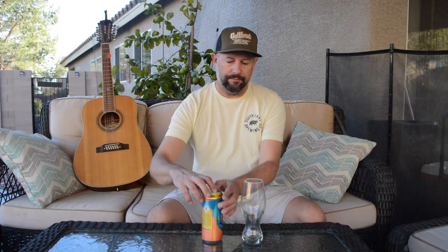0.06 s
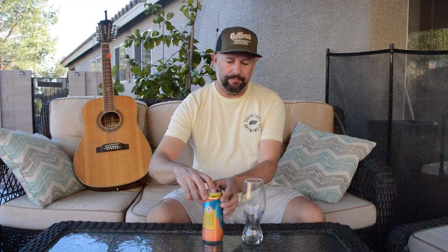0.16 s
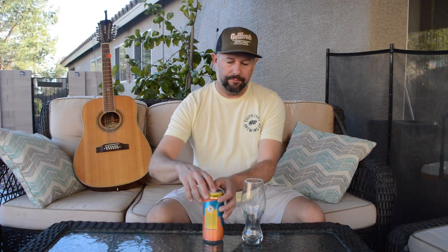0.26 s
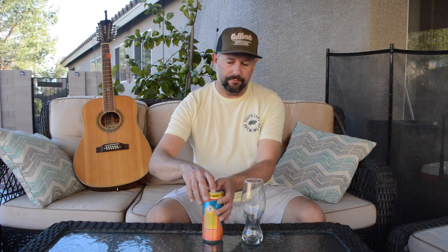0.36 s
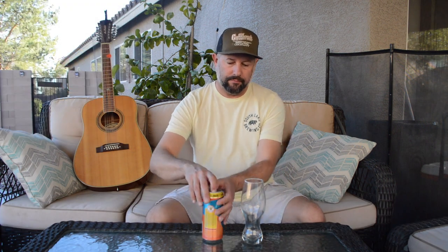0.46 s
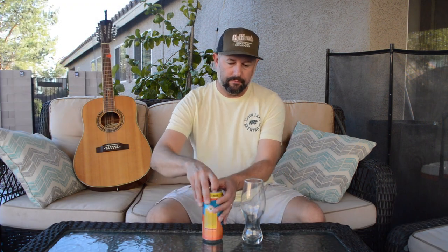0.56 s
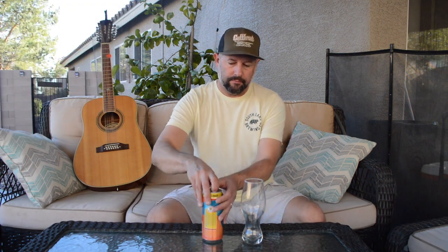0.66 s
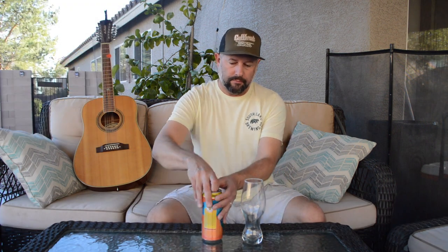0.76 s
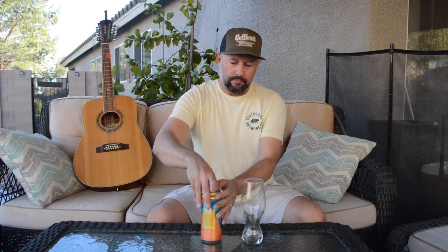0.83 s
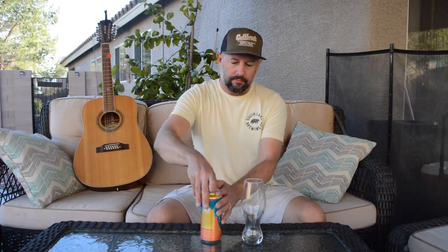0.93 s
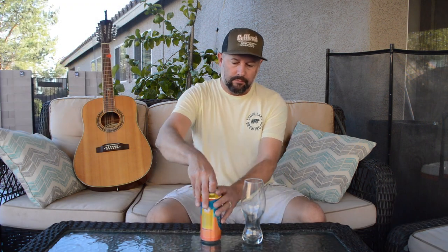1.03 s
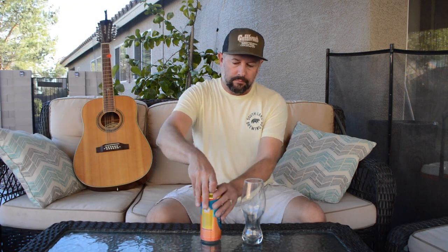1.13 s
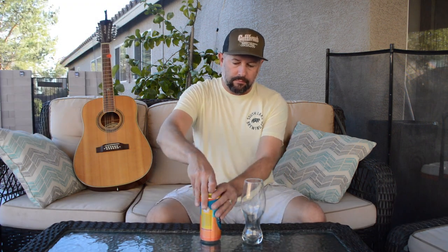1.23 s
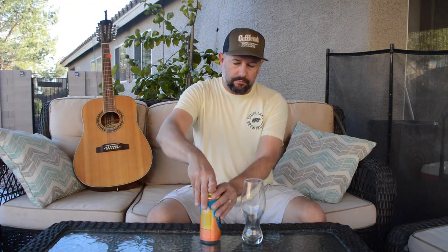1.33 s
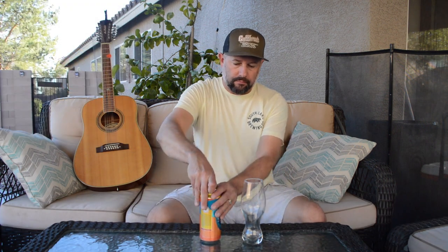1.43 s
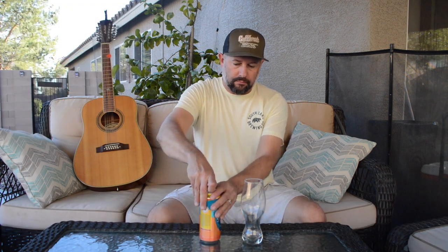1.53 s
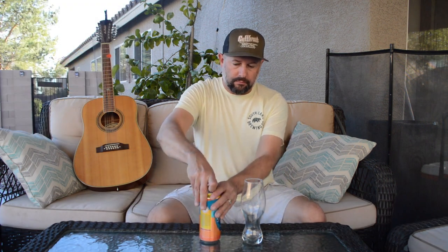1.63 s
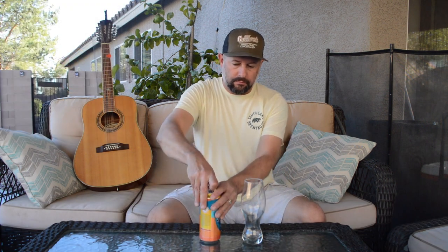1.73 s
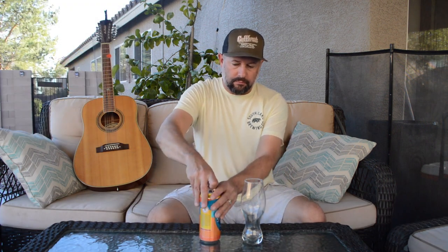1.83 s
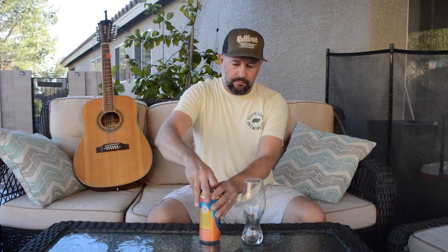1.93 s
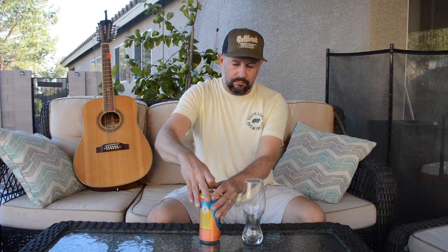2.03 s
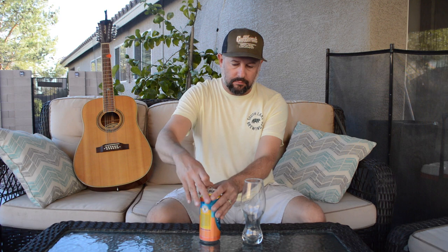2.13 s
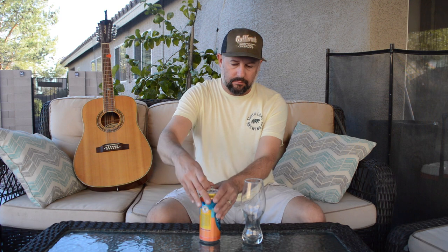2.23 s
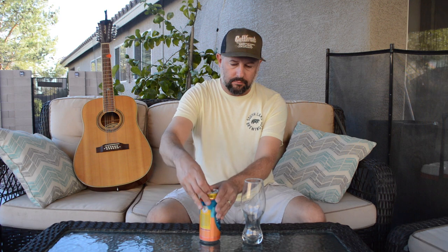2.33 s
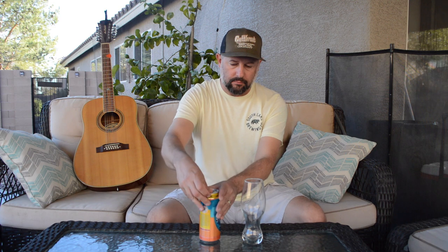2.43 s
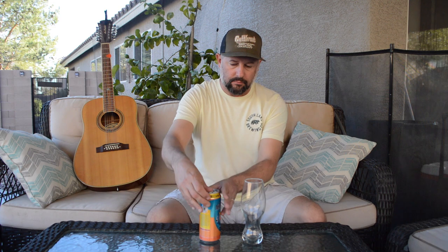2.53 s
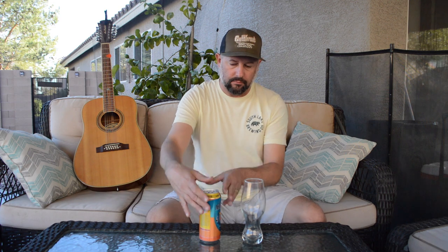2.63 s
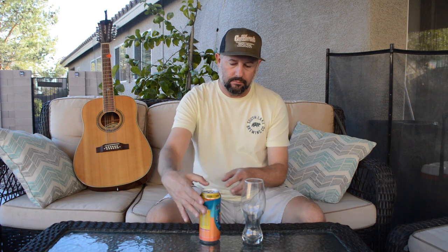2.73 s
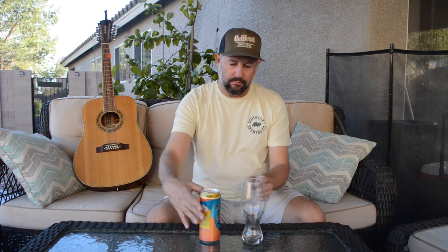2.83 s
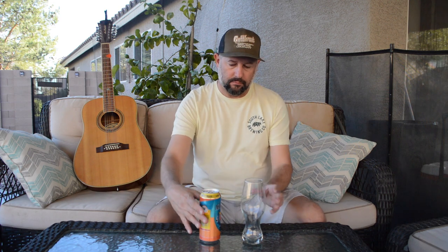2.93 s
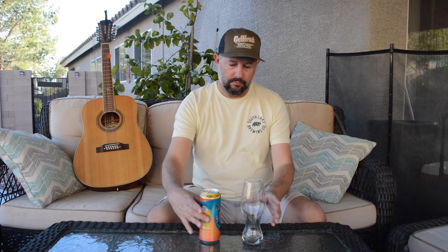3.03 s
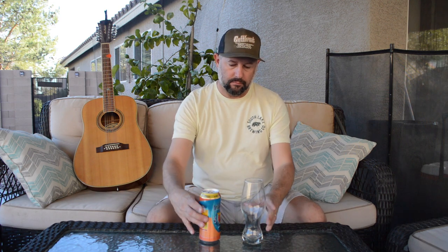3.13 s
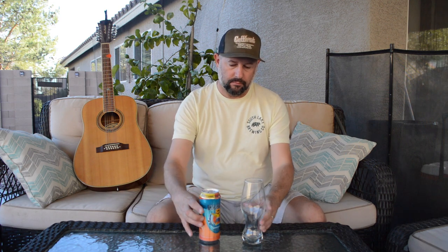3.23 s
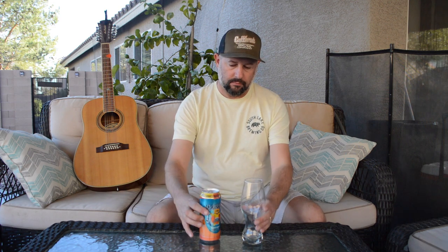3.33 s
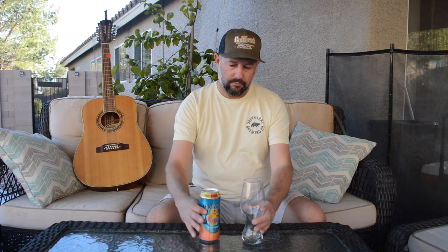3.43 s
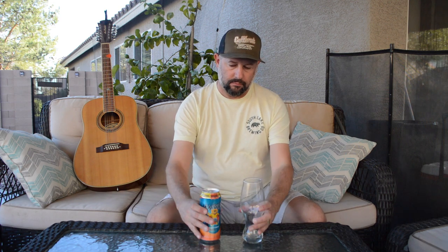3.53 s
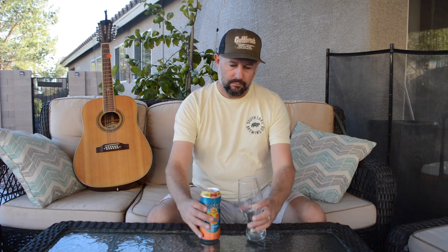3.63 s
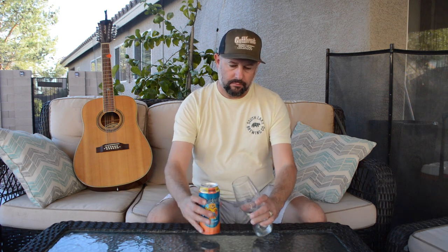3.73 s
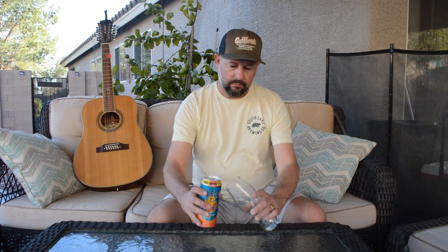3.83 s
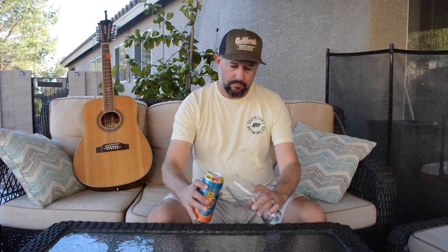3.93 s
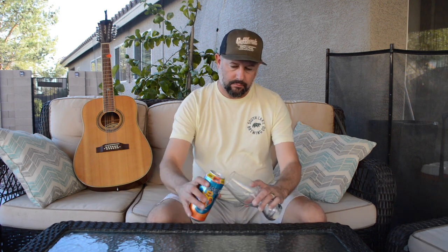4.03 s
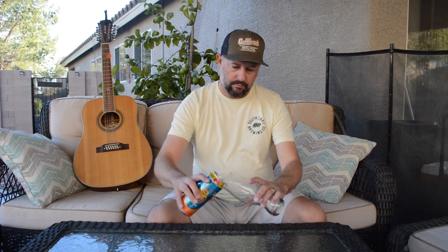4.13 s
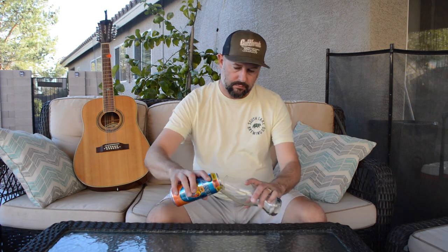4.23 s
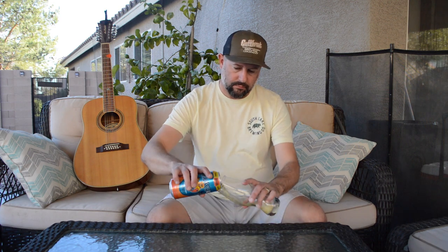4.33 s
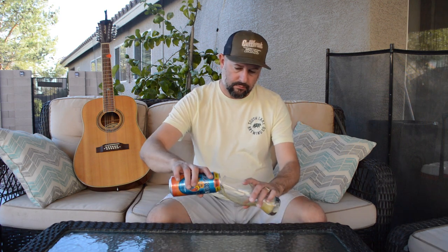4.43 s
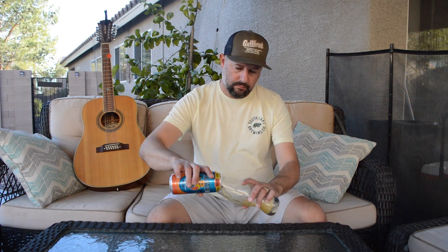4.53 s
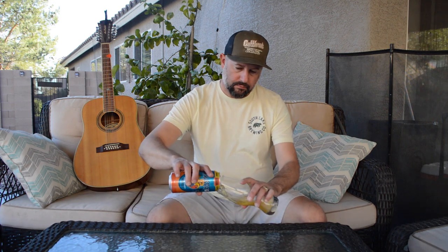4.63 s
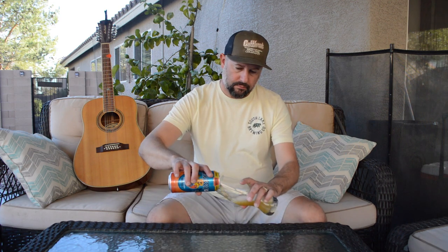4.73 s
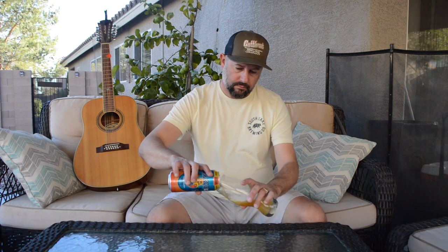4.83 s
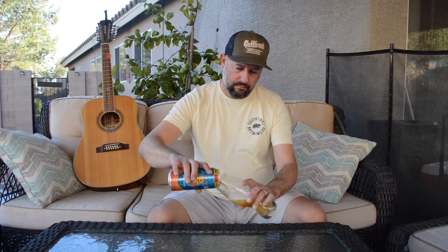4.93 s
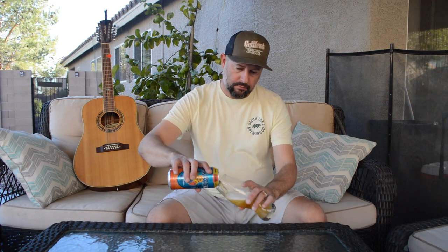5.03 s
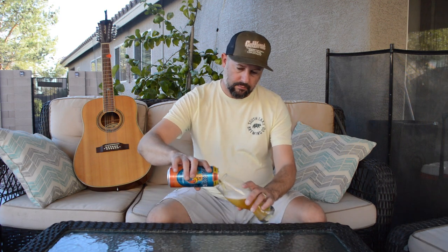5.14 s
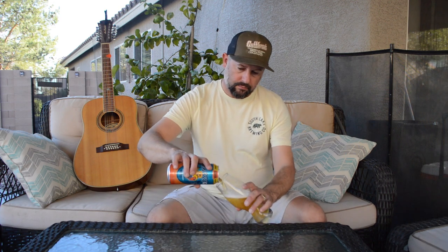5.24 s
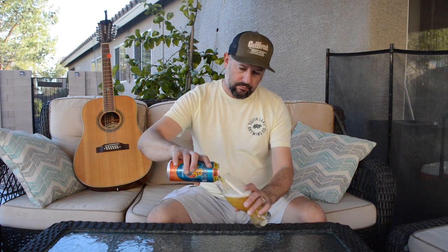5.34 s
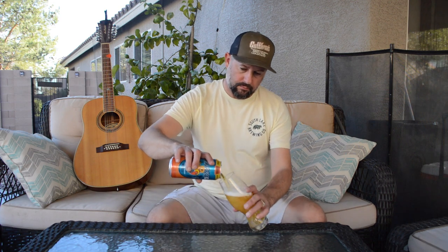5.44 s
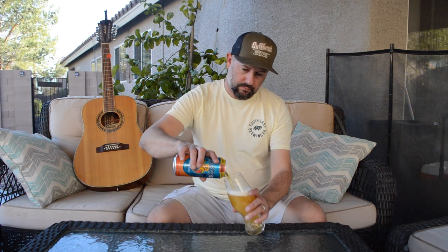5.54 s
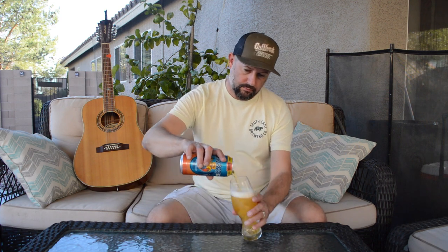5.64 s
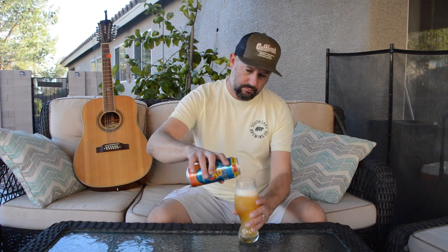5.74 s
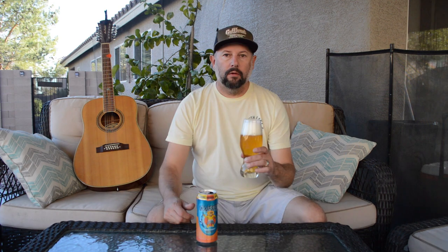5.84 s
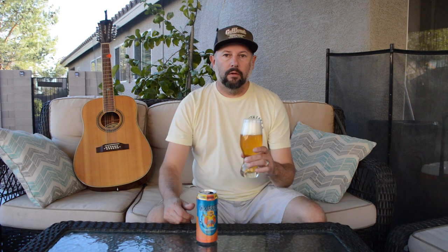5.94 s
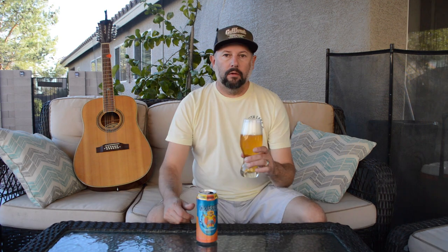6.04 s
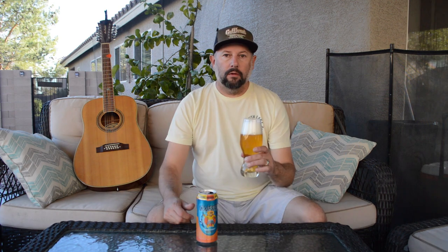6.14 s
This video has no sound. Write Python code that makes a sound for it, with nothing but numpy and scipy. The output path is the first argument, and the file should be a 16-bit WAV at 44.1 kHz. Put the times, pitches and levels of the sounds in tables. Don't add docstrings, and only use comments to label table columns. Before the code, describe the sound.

On a quiet patio, a can cracks open violently with a tiny spit of gas, followed by faint handling, glass scraping, and one sharp glass clack.

```python
import sys
import numpy as np
from scipy import signal
from scipy.fft import rfft, irfft
from scipy.io import wavfile
from scipy.ndimage import uniform_filter1d

SR = 44100
rng = np.random.default_rng(int(sys.argv[2]) if len(sys.argv) > 2 else 0)


def int16_out(signal):
    q = np.round(np.clip(np.atleast_2d(signal).T, -1, 1) * 32767)
    wavfile.write(sys.argv[1], SR, q.astype(np.int16))


def decibels_to_gain(level_db):
    exponent = np.asarray(level_db, float) / 20
    return 10 ** exponent


N = 272538
SPEED = 4


def gain_at(tone, size):
    hz, db = np.transpose(tone)
    bins = np.fft.rfftfreq(size, 1 / SR)
    return decibels_to_gain(np.interp(np.log(bins + 1), np.log(hz), db))


def noise(*tones):
    first = gain_at(tones[0], N)
    gain = np.prod([gain_at(tone, N) for tone in tones], axis=0)
    x = irfft(rfft(rng.standard_normal(N)) * gain, N)
    return x / np.sqrt(np.mean(first ** 2))


def causal(tone, size=1024):
    cepstrum = irfft(np.log(gain_at(tone, size)), size)
    cepstrum[1:size // 2] *= 2
    cepstrum[size // 2 + 1:] = 0
    return irfft(np.exp(rfft(cepstrum)), size)[:size // 2]


def ring(modes, seconds):
    t = np.arange(int(seconds * SR)) / SR
    out = 0
    for k, (hz, db, t60) in enumerate(modes):
        out = out + (-1) ** k * decibels_to_gain(db - 60 * t / t60) * np.sin(2 * np.pi * hz * t)
    return out


def walk(rate):
    k = int(SR / rate)
    held = np.repeat(rng.standard_normal(N // k + 1), k)
    return uniform_filter1d(held, k)[:N]


def swell(start_s, db, rise_s, fall_db_s, hold_s=0, sag_db=0):
    t = np.arange(N) / SR - start_s
    sag = sag_db * np.clip((t - rise_s) / (hold_s + 1e-4), 0, 1)
    fall = fall_db_s * np.clip(t - rise_s - hold_s, 0, 1)
    return np.clip(t / rise_s, 0, 1) * decibels_to_gain(db + sag - fall)


def add(out, s, db, x):
    i = int(s * SR)
    out[i:i + len(x)] += (decibels_to_gain(db) * x / np.abs(x).max())[:N - i]


def cracks(events, tone):
    out = np.zeros(N)
    body = np.pad(causal(tone), (0, 1536))
    for (s, db, ms), chance in zip(events, rng.random((len(events), 5))):
        run = body
        lags = 1 + (ms * SR / 1000 * (.05 + .5 * chance ** 2)).astype(int)
        for lag in lags:
            loop = np.r_[1, np.zeros(lag - 1), -.62]
            run = signal.lfilter(loop[::-1], loop, run)
        first_snap = .35 * body
        add(out, s, db, run + first_snap)
    return out


# t/s, peak level/dB, length/ms
SEAL = [
    (1.5662, -11, 0.96),
]
BUCKLE = [
    (1.6200, -4, .9),
    (1.695, -37.5, .6),
    (1.737, -38, .6),
]
TEAR = [
    (1.7546, -18, 2.5),
    (1.7588, 9.5, 1.2),
]
# f/Hz, level/dB
SEAL_TONE = [(88, -50.5), (150, -30.5), (1480, -21.5), (2550, -9.5), (3620, 4.5), (6910, -0.5), (7620, -15),
             (8560, -6.5), (16000, -25.5)]
BUCKLE_TONE = [(150, -40), (900, -24), (1450, -4), (1850, 0.5), (2700, -10.5), (4300, -3.5), (6600, -5),
               (7800, -16.5), (12000, -15.5), (16000, -23.5)]
TEAR_TONE = [(40, -18), (220, -29), (800, -14.5), (1150, -3.5), (1650, -8), (2400, 2), (3300, 0),
             (4200, -10.5), (7800, -6), (16000, -30.5)]


def lid():
    return cracks(SEAL, SEAL_TONE) + cracks(BUCKLE, BUCKLE_TONE) + cracks(TEAR, TEAR_TONE)


# t/s, level/dB, rise/s, fall/(dB per s), hold/s
PUFFS = [
    (1.5665, -31.5, .002, 450, .012),
    (1.591, -32, .009, 900, .004),
    (1.622, -42, .003, 350, .005),
]
# f/Hz, level/dB
GAS_TONE = [(180, -53.5), (300, -27), (930, -23), (1230, -9.5), (1930, -8.5), (2140, -7), (3580, -5.5),
            (4300, 1), (11300, -5.5), (11900, -1.5), (16000, -19)]


def gas():
    flutter = decibels_to_gain(2.0 * walk(300))
    return sum(swell(*row) for row in PUFFS) * flutter * noise(GAS_TONE)


# t/s, peak level/dB, length/ms
TAPS = [
    (1.21, -48.5, 3.),
    (2.225, -42, 2.),
    (2.445, -43.5, 2.),
    (3.375, -50, 2.),
]
# f/Hz, level/dB
TAP_TONE = [(300, -30.5), (1100, 2), (1900, -8), (3000, -3.5), (5000, -17), (10000, -11)]


def taps():
    return cracks(TAPS, TAP_TONE)


# t/s, level/dB, rise/s, fall/(dB per s)
BRUSHES = [
    (.09, -61.5, .03, 250),
    (.8, -69, .1, 160),
]
# f/Hz, level/dB
BRUSH_TONE = [(1000, -28.5), (4000, -8), (5500, -7), (7500, -3.5), (9000, -15), (16000, -40)]


def brushing():
    return sum(swell(*row) for row in BRUSHES) * noise(BRUSH_TONE)


# f/Hz, level/dB, t60/s
CAN = [(972, -12, 0.45), (1055, -11, 0.25), (2007.6, -13, 0.41), (2097, -7, 0.36), (2803, -8, 0.14),
       (3408, -34, 0.51), (3640, -17.5, 0.34), (4830, -16, 0.22), (5440, 1, 0.084), (5930, -20, 0.23),
       (7180, -3.5, 0.11), (7434, -3.5, 0.11), (8508, -0.5, 0.083), (8700, -28.5, 0.36)]


def can():
    hits = lid() + taps()
    wall = decibels_to_gain(-49.5) * signal.fftconvolve(hits, ring(CAN, 0.45))[:N]
    return hits + wall + gas() + brushing()


# f/Hz, level/dB, t60/s
TABLE = [(119, -16, 0.26), (227, -7.5, 0.072), (276, -12.5, 0.052), (522.3, 0, 0.034), (620, -3.5, 0.041),
         (725, 3, 0.016), (1156, -2.5, 0.022), (1400, -5.5, 0.015), (1800, -6, 0.014), (2470, -7, 0.012),
         (3997, -11, .01), (4730, -9, 0.013)]
# t/s, peak level/dB, thud level/dB
NUDGES = [
    (.003, -48, -5),
    (.098, -47, -10),
    (.2, -53, -10),
    (.29, -59, -10),
    (.485, -48, -20),
    (2.32, -58, -12),
    (3.104, -53, -8),
    (3.138, -63, -10),
]
# t/s, peak level/dB
CATCHES = [(3.405, -56), (3.433, -42.5), (3.449, -38), (3.454, -39.5), (3.466, -37), (3.49, -47),
           (3.506, -48.5), (3.526, -32.5), (3.54, -46), (3.571, -35), (3.593, -52.5), (3.611, -50.5)]


def table():
    out = np.zeros(N)
    knocks = []  # t/s, peak level/dB, push/ms, modes
    for s, db, thud_db in NUDGES:
        thud = (280, thud_db, .09)
        knocks.append((s, db, 1.1, TABLE + [thud]))
    for s, db in CATCHES:
        push_ms = .17 + .012 * max(-37 - db, 0)
        knocks.append((s, db, push_ms, TABLE))
    for (s, db, ms, modes), chance in zip(knocks, rng.standard_normal((len(knocks), SR // 4))):
        spot = [(hz, level_db + 3. * c, t60) for (hz, level_db, t60), c in zip(modes, chance[::-1])]
        body = ring(spot, .2)
        body[:2] += [9, -3]
        rough = body * (1 + 0.32 * chance[:len(body)])
        push = np.hanning(int(SR * ms / 1000) + 3)
        add(out, s, db, np.convolve(rough, push))
    slips = (rng.random(N) < 500 / SR) * rng.standard_normal(N)
    rub = signal.fftconvolve(slips, ring(TABLE, .2))[:N] + 8.0 * slips
    drag = swell(3.38, -59, rise_s=.05, fall_db_s=350, hold_s=.17, sag_db=-4)
    return out + drag * rub / rub.std()


# t/s, peak level/dB, f/Hz
GULPS = [
    (4.35, -61, 1820),
    (4.41, -58, 1800),
    (4.44, -60.5, 1840),
]


def pour():
    out = np.zeros(N)
    for s, db, hz in GULPS:
        add(out, s, db, ring([(hz, 0, .06)], .06))
    return out


# t/s, peak level/dB
SET_DOWN = [
    (5.6724, -17),
    (5.6905, -36),
    (5.7004, -46),
    (5.7031, -44),
    (5.7095, -37),
    (5.7121, -43),
    (5.7165, -46),
]
# f/Hz, level/dB
SET_TONE = [(150, -30), (735, -7), (1300, -8), (2300, -1.5), (3830, -4), (4430, -8.5), (5800, -1.5),
            (8900, -12.5), (9930, -7), (14600, -15.5), (16000, -8)]
# f/Hz, level/dB, t60/s
GLASS = [(1540, -15, 0.044), (3540, -5.5, 0.016), (3876, -10, 0.025), (4400, -22, 0.13), (4662, -17, 0.062),
         (6040, -3, 0.014), (6535, -12, 0.032), (7900, -14, 0.021), (8818, -24, 0.061), (9959, -10, 0.045)]


def set_down():
    ticks = np.zeros(N)
    for s, db in SET_DOWN:
        weaker_db = SET_DOWN[0][1] - db
        contact = np.hanning(3 + int(3.5 * weaker_db * SR / 10 ** 6))
        ticks += np.convolve(cracks([(s, db, .2)], SET_TONE), contact, "same")
    t = np.arange(SR // 20) / SR
    glass = decibels_to_gain(-32) * ring(GLASS, len(t) / SR)
    rattle = decibels_to_gain(-25 - 60 * t / .028) * np.diff(rng.standard_normal(len(t)), prepend=0)
    return ticks + signal.fftconvolve(ticks, glass + rattle)[:N]


# delay/ms, level/dB
ECHOES = [
    (3.5, -22),
    (10.8, -25.5),
    (14.2, -21),
    (26, -31),
]
# f/Hz, level/dB, t60/s of the near clutter, t60/s of the roofed space
TAIL = [(125, -46, 0.13, 0.18), (263, -44.5, .06, 0.24), (496.4, -42.5, 0.097, 0.42),
        (1050, -41, 0.058, 0.41), (1980, -37.5, 0.075, .42), (4300, -37.5, 0.058, 0.46),
        (8000, -38.5, .09, .3), (14000, -42, .06, .15)]


def patio(x, speed=1):
    t = np.arange(int(.6 * SR / speed)) / SR * speed
    tail = np.zeros((2, len(t)))
    for hz, db, near_t60, far_t60 in TAIL:
        edges = np.minimum([hz / np.sqrt(2), hz * np.sqrt(2)], [16000, 20000])
        octave = signal.butter(2, edges, "band", fs=SR, output="sos")
        band = signal.sosfilt(octave, rng.standard_normal(tail.shape))
        decay = decibels_to_gain(db - 60 * t / near_t60) + decibels_to_gain(db - 18 - 60 * t / far_t60)
        tail += decay * band / band.std()
    mid, side = tail * np.minimum(t / 0.0017, 1)
    mid[0] = 1
    for ms, db in ECHOES:
        add(mid, ms / 1000 / speed, db, np.hanning(8))
    return np.array([signal.fftconvolve(x, mid + way * decibels_to_gain(-24) * side)[:N] for way in (1, -1)])


# f/Hz, level/dB
HUM = [(59.2, -73.5), (118.4, -74.5)]
FAST_HUM = [(150.7, -78.5), (242.2, -75.5), (479.1, -74.5), (958.2, -83), (4716, -82)]
# f/Hz, level/dB
FLOOR = [(15, -37), (25, -6.5), (49, -4), (108, -2), (285, -5), (394, -8.5), (695, -9), (1840, -13.5),
         (14800, -17.5), (16000, -21)]
FAST_FLOOR = [(15, -35), (60, -15), (120, -9), (160, -7.5), (200, -6.5), (400, -4), (640, -6.5),
              (2000, -10), (6000, -14), (16000, -17.5)]
# f/Hz, side minus mid level/dB
FLOOR_SIDE = [(60, -14.5), (110, -14.5), (200, -12), (380, -9), (700, -9), (1290, -7), (2380, -6.5),
              (4400, -5), (8120, -3), (15000, -3.5)]


def floor(tone, db, lines):
    t = np.arange(N) / SR
    mid = decibels_to_gain(db + 0.66 * walk(1.4)) * noise(tone)
    for hz, level_db in lines:
        level = np.sqrt(2) * decibels_to_gain(level_db + 3.0 * walk(5))
        mid = mid + level * np.sin(2 * np.pi * hz * t + .8 * walk(5.7))
    side = decibels_to_gain(db) * noise(tone, FLOOR_SIDE)
    return mid + side * np.array([[1], [-1]])


def scene():
    t = np.arange(N) / SR
    fast = np.clip(np.minimum(t - 4.13, 5.8 - t) / 0.025 + .5, 0, 1)
    normal_floor = np.sqrt(1 - fast) * floor(FLOOR, -58.5, HUM)
    fast_floor = np.sqrt(fast) * floor(FAST_FLOOR, -61.5, FAST_HUM)
    lean_db = -0.35
    under = decibels_to_gain([[lean_db / 2], [-lean_db / 2]]) * (normal_floor + fast_floor)
    return patio(can() + table()) + patio(set_down() + pour(), SPEED) + under


def band_limit(x):
    return signal.sosfilt(signal.butter(12, 16350, fs=SR, output="sos"), x)


def record(dry):
    mix = np.clip(dry, -.97, .97)
    return band_limit(mix)


dry = scene()
out = record(dry)
int16_out(out)
```